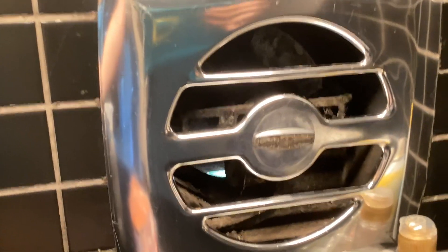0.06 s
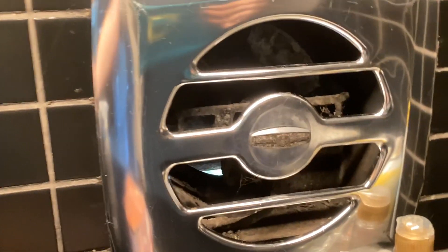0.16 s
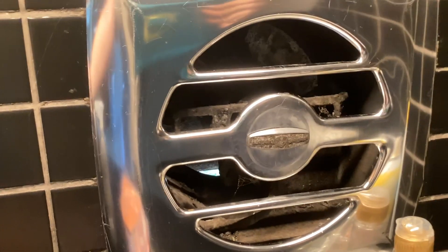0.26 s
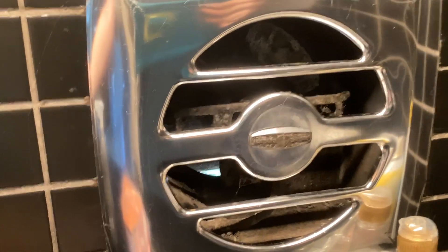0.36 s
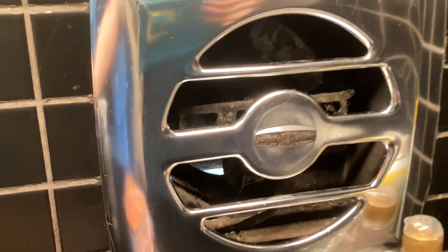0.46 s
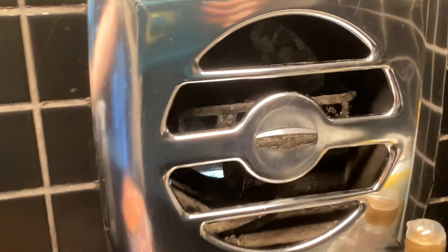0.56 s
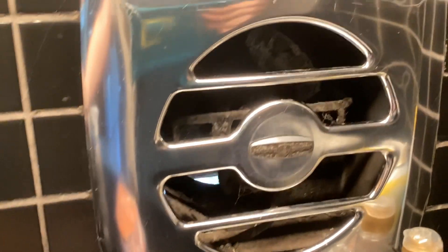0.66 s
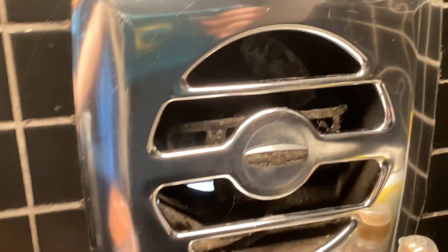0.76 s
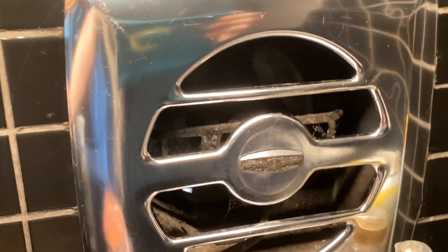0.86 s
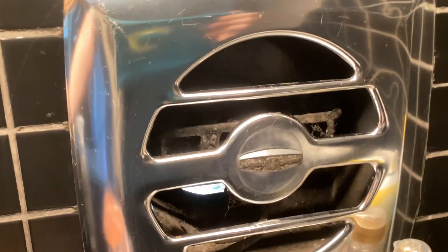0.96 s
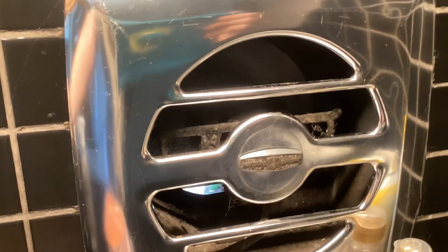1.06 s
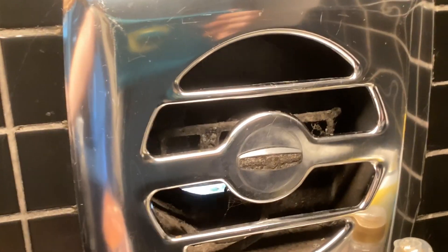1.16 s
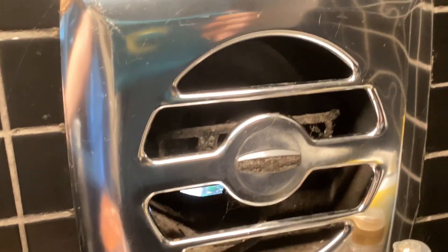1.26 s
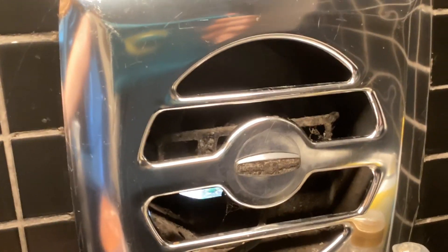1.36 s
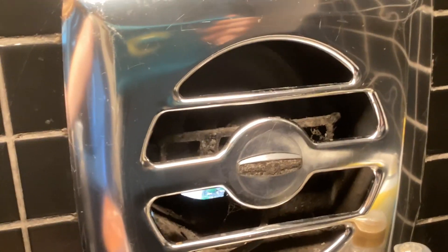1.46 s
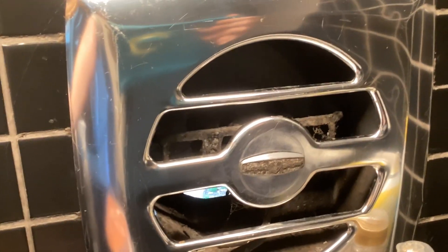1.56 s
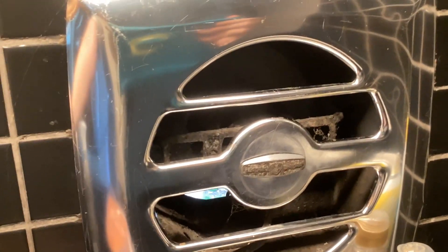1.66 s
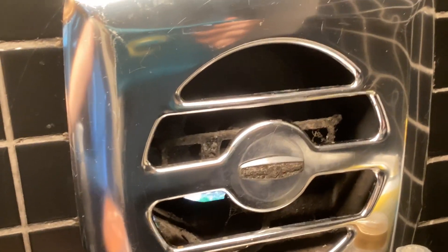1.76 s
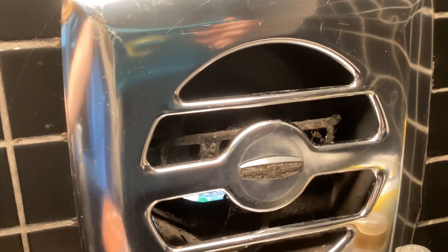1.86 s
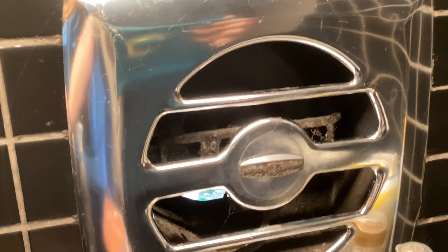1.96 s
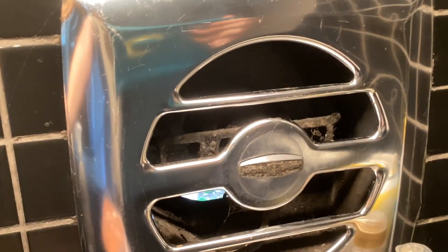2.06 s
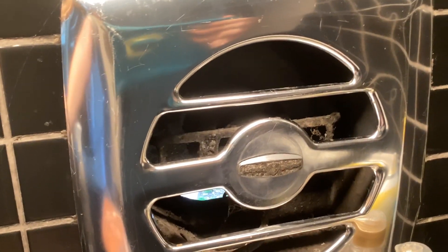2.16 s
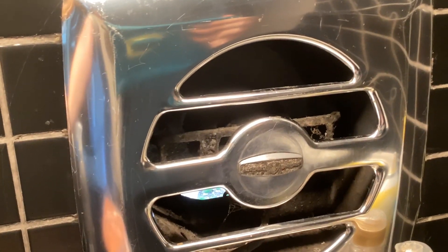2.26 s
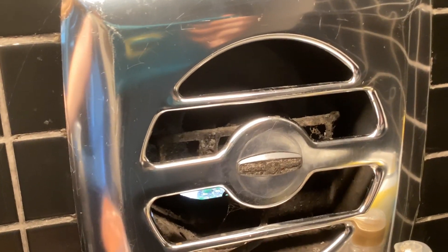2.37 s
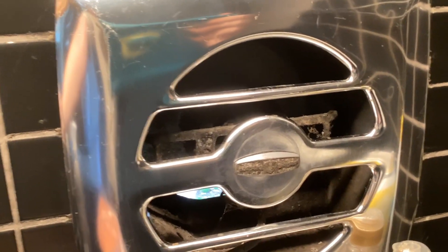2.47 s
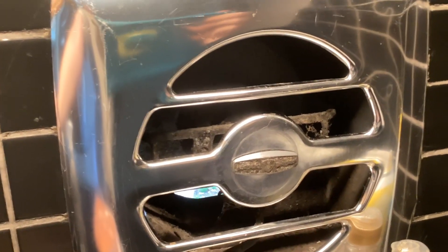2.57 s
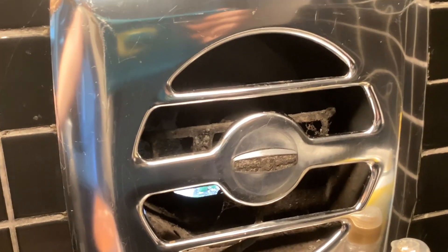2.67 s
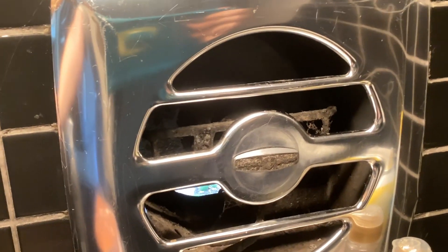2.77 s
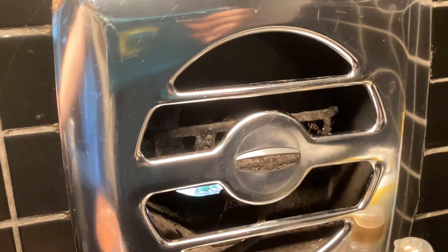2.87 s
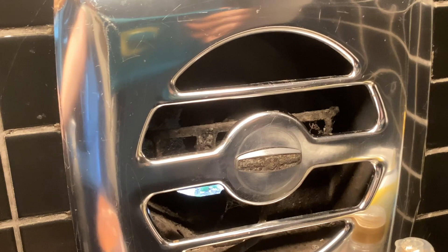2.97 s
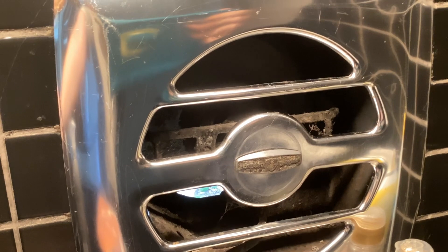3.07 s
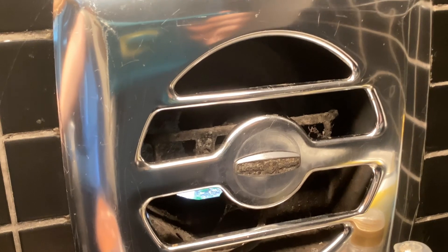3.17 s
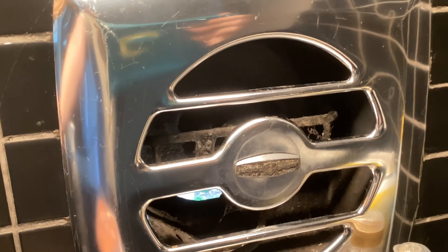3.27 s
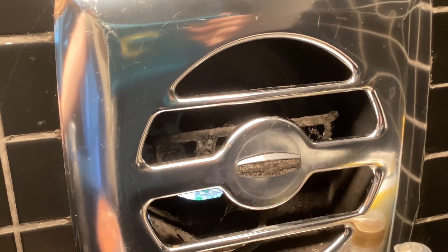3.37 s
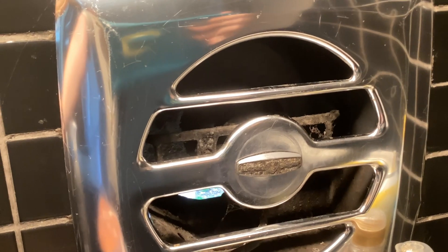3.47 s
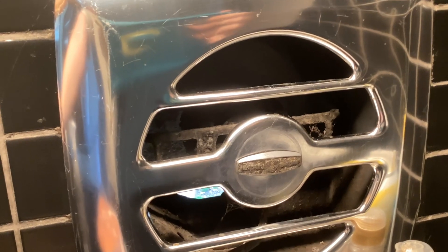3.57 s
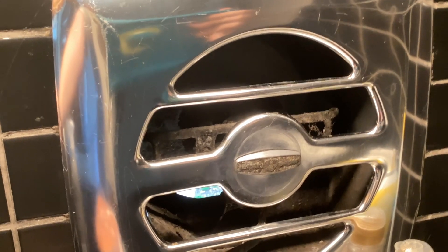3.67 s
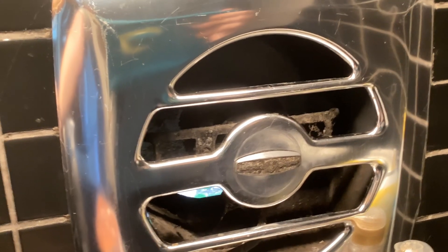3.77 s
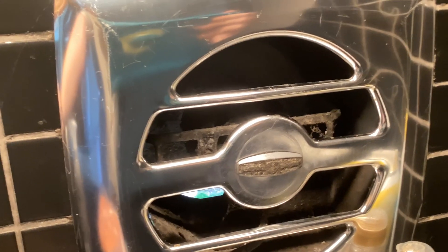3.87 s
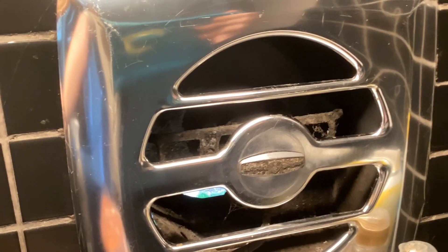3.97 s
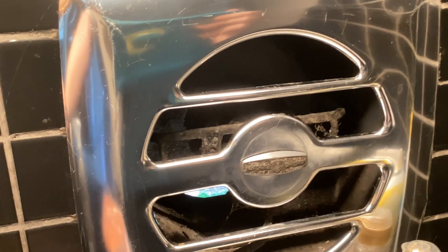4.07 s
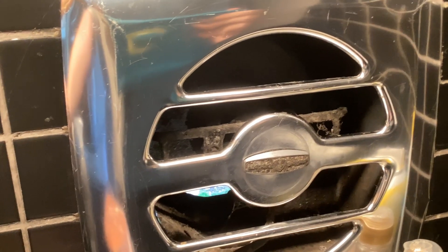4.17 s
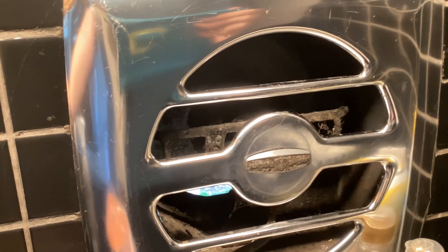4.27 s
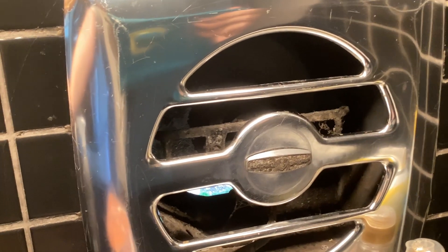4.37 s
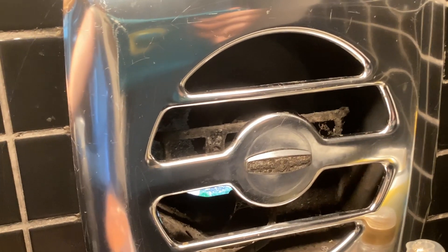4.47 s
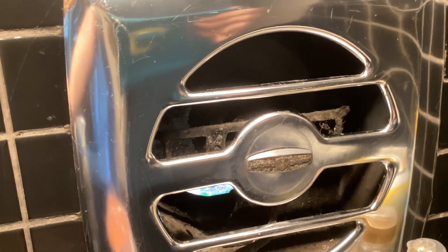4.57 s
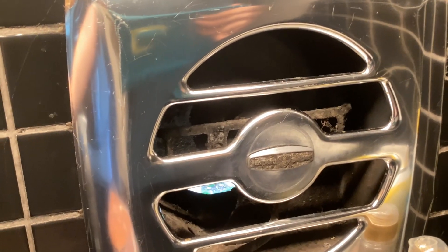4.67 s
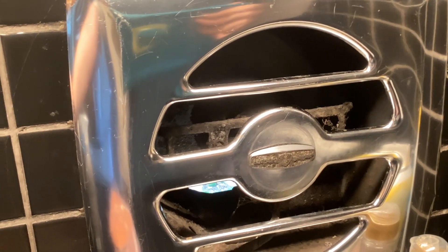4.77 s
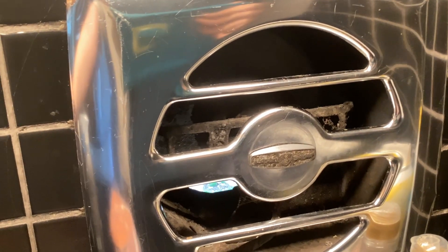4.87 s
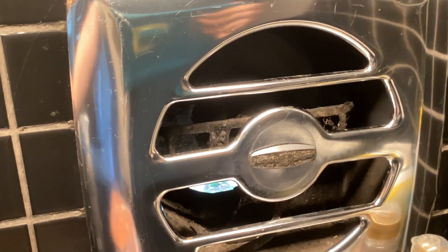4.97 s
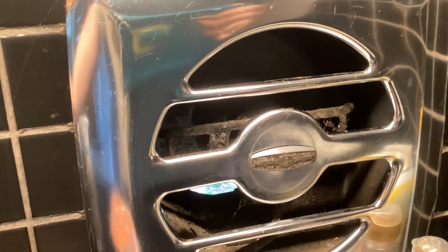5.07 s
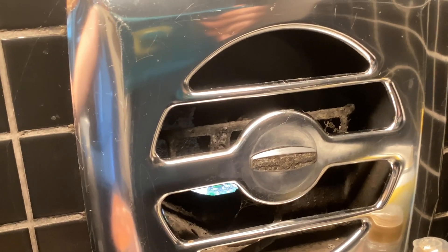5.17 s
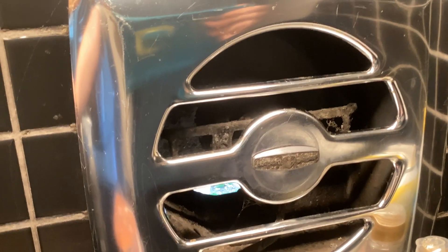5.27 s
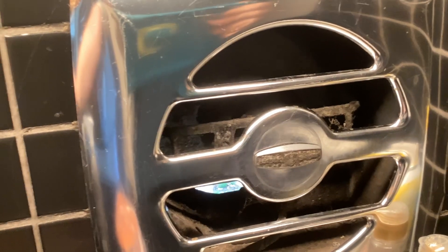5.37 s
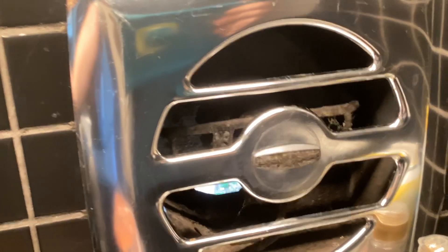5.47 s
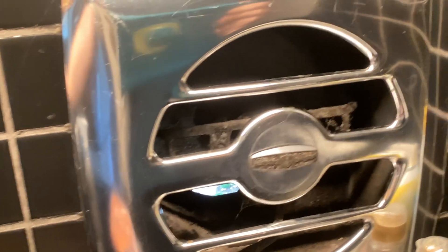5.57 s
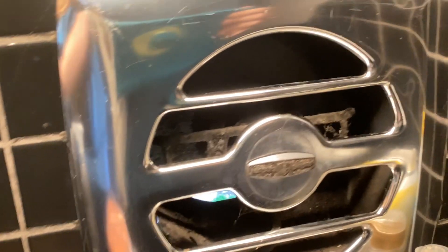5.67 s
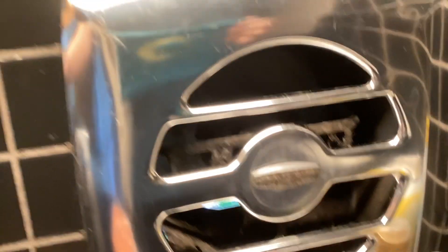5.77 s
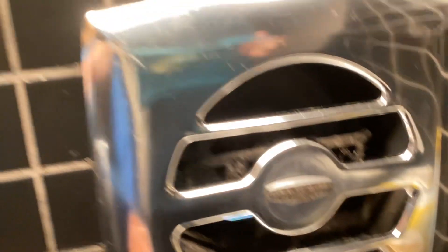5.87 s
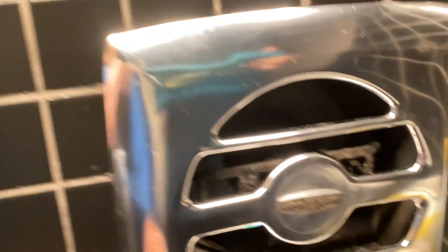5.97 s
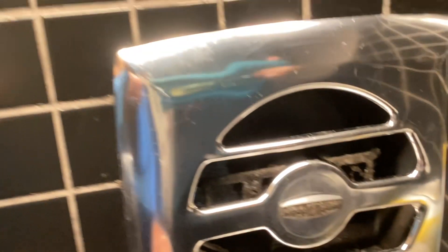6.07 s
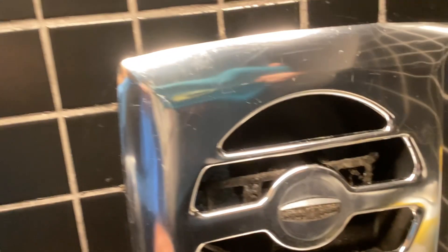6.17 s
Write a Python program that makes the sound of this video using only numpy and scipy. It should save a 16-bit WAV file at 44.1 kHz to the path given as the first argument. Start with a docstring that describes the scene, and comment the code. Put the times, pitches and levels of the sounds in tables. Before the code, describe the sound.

A switch snaps, a small exhaust fan hums and whirs up with loose scraping, runs steadily, then clicks off and rattles while coasting down.

```python
"""A tiled kitchen, with the microphone close to the grille of a small wall exhaust fan.
After a soft bump and a small knock the switch snaps, the motor hums and a three-bladed rotor spins up.
It runs, then coasts down when the power goes. One shaft speed steers the air noise, the blade tones
and the bearings; at listed moments the loose rotor scrapes its surround in short strokes of noise.
Resonances of housing, duct and frame colour it all, over a still room with microphone hiss."""
import sys
import numpy as np
from scipy import signal
from scipy.fft import rfft, irfft, next_fast_len
from scipy.io import wavfile
from scipy.ndimage import uniform_filter1d, map_coordinates

SR = 44100
rng = np.random.default_rng(int(sys.argv[2]) if len(sys.argv) > 2 else 0)


def log_audio(samples):
    """Write samples as a 16-bit WAV file to the path given in sys.argv[1]."""
    # one column per channel
    frames = np.atleast_2d(samples).T
    # limit to full scale, then quantise
    limited = np.clip(frames, -1, 1)
    pcm = np.round(limited * 32767).astype(np.int16)
    wavfile.write(sys.argv[1], SR, pcm)


N = 274919
T = np.arange(N) / SR

# power on and off (s), and the speed the rotor levels off at (turns per s)
ON_S, OFF_S, FULL_RPS = .81, 5.39, 48.1

# multiples of the turning rate at which the three blades sound: multiple [turns]
BLADE_MULTIPLES = (3, 6, 9, 12, 18)
# colour of a light graze: (frequency [Hz], level [dB per Hz])
GRAZE_COLOUR = [(2000, 0.5), (4300, -15.5), (6200, -2), (8000, 6), (11000, 5.5), (13000, 3), (15500, -39.5)]
# colour of a deep rasp: (frequency [Hz], level [dB per Hz])
RASP_COLOUR = [(400, -21), (950, 5), (1900, -7.5), (2550, 1.5), (3700, 0.5), (4400, -10), (8000, -18),
               (15000, -28)]


def amp(db):
    """Decibels to gain."""
    return 10 ** (np.asarray(db) / 20)


def evened(x):
    """Scales to rms 1."""
    return x / np.sqrt(np.mean(x ** 2) + 1e-20)


def read(points, hz):
    """Reads a spectrum on a log-frequency axis."""
    f, value = np.transpose(points)
    return np.interp(np.log(hz + 1), np.log(f + 1), value)


def add(mix, s, sound):
    """Mixes a sound in at time s."""
    part = mix[round(s * SR):][:len(sound)]
    part += sound[:len(part)]


def noise(gain, size=N):
    """Noise of rms 1 with the spectrum gain(hz)."""
    length = next_fast_len(size)
    spectrum = rfft(rng.standard_normal(length))
    coloured = irfft(spectrum * gain(np.fft.rfftfreq(length, 1 / SR)), length)
    return evened(coloured[:size])


def wander(rate):
    """Smooth chance of rms 1 that changes about rate times a second."""
    knots = rng.standard_normal(4096)
    coarse = map_coordinates(knots, [T[::64] * rate], order=3, mode="wrap")
    return evened(coarse)[np.arange(N) // 64]


def bumps_db(resonances, hz):
    """Peaks and dips that a set of resonances adds to a spectrum."""
    return sum(db / (1 + (2 * (hz - f) / width) ** 2) for f, width, db in resonances)


def resonance_gain(modes, f):
    """Spectrum of a set of resonances."""
    return sum(amp(db) / (1 + (2 * (f - hz) / width) ** 2) for hz, width, db in modes)


def ringing(modes):
    """Noise of rms 1 that sounds only in the given resonances."""
    return noise(lambda f: resonance_gain(modes, f))


def burst(bands, rise=.002):
    """A blow: bands of noise that each swell and die at their own pace."""
    t, out = np.arange(SR // 2) / SR, np.zeros(SR // 2)
    centres = [row[0] for row in bands]
    edges = [centres[0] / 2, *centres, centres[-1] * np.sqrt(2)]
    for k, (hz, db, delay, t60) in enumerate(bands):
        # each band fades in and out between its neighbours' centres
        triangle = [(edges[k], 0), (hz, 1), (edges[k + 2], 0)]
        band = noise(lambda f: np.sqrt(read(triangle, f)), size=len(t))
        age = np.maximum(t - delay, 0)
        out += band * (1 - np.exp(-(age / rise) ** 2)) * amp(db - 60 * age / t60)
    return out


def struck(modes, wait_cycles=1, swell_cycles=1.3):
    """Modes rung by a blow; the low ones take longer to build."""
    t, out = np.arange(SR // 2) / SR, np.zeros(SR // 2)
    for hz, db, t60 in modes:
        age = np.maximum(t - wait_cycles / hz, 0)
        swell = 1 - np.exp(-(age * hz / swell_cycles) ** 2)
        out += swell * amp(db - 60 * age / t60) * np.sin(2 * np.pi * hz * age)
    return out


def stroke(gain, rise, contact, t60):
    """One short rub with the spectrum gain(hz): it swells, holds while in contact and dies."""
    t = np.arange(SR // 8) / SR
    shape = (1 - np.exp(-t / rise)) * amp(-60 * np.maximum(t - contact, 0) / t60)
    return evened(shape * noise(gain, size=len(t))) * np.sqrt(np.mean(shape ** 2))


def room_tone(level_db):
    """The still kitchen and the microphone's hiss: steady coloured noise."""
    # (frequency [Hz], level [dB per Hz])
    still_colour = [(25, -29.5), (60, 1), (115, 6), (200, -12), (500, -16.5), (1200, -26), (3000, -30.5),
                    (8000, -33.5), (11800, -24), (15500, -36)]
    return amp(level_db) * noise(lambda f: amp(read(still_colour, f)))


def kitchen(x, wet_db=-13.5, t60=0.17, damp_hz=3600):
    """Short reverberation off the tiles: decaying noise, softened in the treble, from 6 ms on."""
    t = np.arange(SR // 2) / SR
    tail = noise(lambda f: 1 / np.hypot(1, f / damp_hz), size=len(t))
    tail = tail * amp(-60 * t / t60) * (t > .006)
    return x + amp(wet_db) * signal.fftconvolve(x, tail / np.linalg.norm(tail))[:N]


def handling():
    """A soft, low bump and a small knock before the switch: noise bands and rung modes."""
    bump_s, knock_s = .270, .590
    # noise of the bump and of the knock: (centre [Hz], level [dB], delay [s], t60 [s])
    bump_bands = [(220, -53, .005, .1), (520, -61, .003, .1), (1200, -68, .001, .09), (4000, -89, 0, .06),
                  (12000, -65, 0, .07)]
    knock_bands = [(704, -84, 0.007, .1), (2300, -72, 0.0021, 0.09), (5000, -86, 0.004, 0.064),
                   (12000, -65, 0.00088, 0.11)]
    # modes they ring: (frequency [Hz], level [dB], t60 [s])
    bump_rings = [(86, -43, .12), (158, -42, .15), (215, -45, .06), (377, -56, .1)]
    knock_rings = [(1630, -75.5, 0.15), (1940, -78, .2), (2794, -66, 0.07)]
    out = np.zeros(N)
    bump = burst(bump_bands, rise=0.0023) + struck(bump_rings, wait_cycles=1.2, swell_cycles=1.3)
    knock = burst(knock_bands, rise=0.00091) + struck(knock_rings, wait_cycles=5.7, swell_cycles=3)
    add(out, bump_s, bump)
    add(out, knock_s, knock)
    return out


def swishes():
    """Thin hisses: a faint, fading one from the knock on, another as the rotor gets moving."""
    # (time [s], length [s], level [dB])
    hisses = [(.59, 0.86, -77.5), (1.235, 0.15, -57)]
    colour = [(1500, -17), (3200, -6.5), (5000, -4), (9000, 3.5), (12000, 14.0), (15500, -10)]
    level = np.zeros(N)
    for s, length, db in hisses:
        age = np.clip((T - s) / length, 0, 1)
        level += amp(db) * np.minimum(age * 10, 1) * (1 - age)
    return level * noise(lambda f: amp(read(colour, f)))


def switch(lag=0.0035, slide_db=-40, slide=0.0036):
    """Each throw slides, snaps, rings the case and echoes; the starting motor jolts the case again."""
    # the switch goes on, then off: (time [s], level [dB])
    switch_throws = [(ON_S, 0), (OFF_S, -5.5)]
    # the snap, then its dying away between the tiles: (centre [Hz], level [dB], delay [s], t60 [s])
    snap_bands = [(250, -39, 0.0082, 0.12), (535, -39, 0.007, .12), (1080, -37, 0, 0.045),
                  (1730, -31.5, 0.0051, .05), (2520, -29.5, 0.0022, .043), (3640, -37.5, 0.0038, .04),
                  (5550, -35.5, 0.0004, 0.03), (8530, -33.5, 0.0019, .047), (11700, -24.5, 0, .045),
                  (14900, -54, 0.011, .03)]
    echo_bands = [(595, -57, .01, .35), (1080, -50, .0087, .33), (1760, -54, .008, .29),
                  (2670, -50, .008, .29), (3900, -54, .0068, .2), (6000, -54.5, .0074, .23),
                  (8800, -53.5, .008, .25), (12000, -50, .008, .23)]
    # modes of the latch and of the case: (frequency [Hz], level [dB], t60 [s])
    latch_modes = [(1985, -33, .055), (2665, -28, .04), (3150, -39.5, 0.053), (3780, -31.5, .055)]
    case_modes = [(80.6, -33.5, .16), (126, -21, .07), (198, -26, .1), (511, -45, .18), (684, -40, .13),
                  (1000, -18.5, .05), (1093, -35, .19), (1155, -41, .2), (1385, -45, .14), (1739, -46, .14),
                  (2692, -50, .22), (2772, -53, .22), (3844, -53, .2)]
    jolt_s, jolt_db = .886, -23
    out = np.zeros(N)
    lead = np.arange(SR // 32) / SR
    case_ring = struck(case_modes, wait_cycles=0.74, swell_cycles=1.5)
    for s, throw_db in switch_throws:
        # the sliding grows louder right up to the snap
        drag = noise(lambda f: amp(read(GRAZE_COLOUR, f)) + amp(read(RASP_COLOUR, f)), size=len(lead))
        add(out, s - lead[-1], amp(throw_db + slide_db) * drag * np.exp(-lead[::-1] / slide))
        snap = burst(snap_bands, rise=0.00015) + struck(latch_modes)
        echo = burst(echo_bands, rise=0.0047)
        add(out, s, amp(throw_db) * (snap + echo))
        add(out, s + lag, amp(throw_db) * case_ring)
    add(out, jolt_s, amp(jolt_db) * case_ring)
    return out


def rotor_speed():
    """Turns per second: a steady run-up that levels off, then drag alone once the power is cut."""
    # the torque builds for a moment; a higher knee levels off more abruptly
    torque_lag_s, gain_rps_per_s, knee = .27, 22.3, 8.5
    coast_s, coast_power = 1.4, 1.27  # time scale and steepness of the slowing by drag
    driven = np.clip(T, ON_S, OFF_S) - ON_S
    coasting = np.maximum(T - OFF_S, 0)
    ramp = gain_rps_per_s * (driven + torque_lag_s * np.expm1(-driven / torque_lag_s))
    speed = ramp / (1 + abs(ramp / FULL_RPS) ** knee) ** (1 / knee)
    return speed / (1 + coasting / coast_s) ** coast_power


def hum(speed, curve=0.96, release=0.046):
    """The powered motor iron buzzes at twice the mains frequency, louder and less steady with speed."""
    # partials: (frequency [Hz], relative level [dB])
    partials = [(120, -1.5), (240, -37.5), (840, -25.5), (960, -24.5)]
    rest_db, full_db = -48.5, -32.5  # at rest and at full speed
    waver_db, rough_db = 2.2, 1.5  # waver at full speed; roughness per octave above the lowest partial
    lines = np.zeros(N)
    for hz, db in partials:
        roughness = rough_db * np.log2(hz / partials[0][0]) * wander(45)
        lines += amp(db + roughness) * np.sin(2 * np.pi * (hz * T + rng.random()))
    powered = np.clip((T - ON_S) / release, 0, 1) * np.clip((OFF_S + release - T) / release, 0, 1)
    share = abs(speed / FULL_RPS) ** curve
    strength = (1 - share) * amp(rest_db) + share * amp(full_db)
    return evened(lines) * strength * amp(waver_db * share * wander(31)) * powered


def bearings(octaves, turns, level_db=-41, growth_db=7, throb=0.11, whirl=0.15, lumpy_db=2.0):
    """Rolling noise rings the frame unevenly, surging twice a turn and in a whirl at half speed."""
    # resonances of the motor frame: (frequency [Hz], width [Hz], level [dB])
    frame_modes = [(338.7, 20, 0.5), (413, 86, -4), (703, 6.6, -2), (861.7, 10, 8.5), (945, 94, -7.5),
                   (1210, 210, -16.5)]
    spin = 2 ** (octaves / 2)  # the surges deepen with speed
    surge = (1 + spin * throb * np.cos(4 * np.pi * turns)) * (1 + spin * whirl * np.cos(np.pi * turns))
    level = level_db + growth_db * octaves + lumpy_db * wander(18)
    return ringing(frame_modes) * surge * amp(level) * (T > ON_S)


def rolling(speed, turns, level_db=-52, growth_db=10, fade_rps=30, count=14):
    """While the driven rotor is slow, overtones of the rolling balls glide through frame resonances."""
    # (frequency [Hz], width [Hz], level [dB])
    glide_modes = [(348, 33, 2), (412, 46, 1), (705, 22, -5), (866, 25, 4), (945, 70, -2)]
    balls_per_turn = 6  # balls that roll past in one turn
    colour, out = resonance_gain(glide_modes, np.arange(SR // 4)), np.zeros(N)
    for k in range(1, count + 1):
        order = k * balls_per_turn
        out += colour[(order * speed).astype(int)] * np.sin(2 * np.pi * (order * turns + rng.random()))
    level = level_db + growth_db * np.log2(np.maximum(speed, 1) / fade_rps)
    slow = np.clip(speed - 2, 0, 1) * np.exp(-(speed / fade_rps) ** 6)
    return out * amp(level) * slow * (T < OFF_S)


def whine(speed, octaves, turns, level_db=-52, growth_db=16.5, grain_db=1.9, gap=0.72, limp=.2,
          dry_rps=7.5):
    """Above dry_rps a dry spot in the bearing chirps twice a turn, one chirp stronger than the other."""
    # thin ringing of the bearings: (frequency [Hz], width [Hz], level [dB])
    bearing_modes = [(1540, 200, -29), (3070, 88, -16), (3530, 200, -21), (4920, 110, 15), (6800, 170, 4)]
    chirps = (1 + gap * np.cos(4 * np.pi * turns)) * (1 + limp * np.cos(2 * np.pi * turns))
    chirps = chirps * amp(grain_db * wander(50))
    level = amp(level_db + growth_db * octaves)
    return evened(ringing(bearing_modes) * chirps) * level * np.clip(speed - dry_rps, 0, 1)


def shudder(speed, turns, level_db=-34.0, driven_db=-4, critical_rps=33.55, spread_rps=1.8, hz=965,
            width_hz=110):
    """Near its critical speed the rotor shakes and the case rings; power holds the rotor steadier."""
    throb = .65  # depth of the once-a-turn pulsing (0-1)
    near = np.exp(-.5 * ((speed - critical_rps) / spread_rps) ** 2)
    level = level_db + driven_db * (T < OFF_S)
    return amp(level) * near * ringing([(hz, width_hz, 0)]) * (1 + throb * np.cos(2 * np.pi * turns))


def brushing(speed, turns, level_db=-64, growth_db=13, from_rps=8.6, until_rps=29, depth_db=5,
             uneven_db=1.5):
    """While slow and driven, the rotor brushes its surround in an uneven patch on each turn."""
    # resonances it rings: (frequency [Hz], width [Hz], level [dB])
    brushed_modes = [(1164, 120, 14), (1553, 60, 9), (1900, 150, -10), (2910, 89, 3), (3330, 150, -15),
                     (3800, 130, -23)]
    touching = np.clip(speed - from_rps, 0, 1) * np.clip(until_rps - speed, 0, 1) * (T < OFF_S)
    level = level_db + growth_db * np.log2(np.maximum(speed, 1) / (2 * from_rps))
    patch_db = depth_db * np.cos(2 * np.pi * turns) + uneven_db * wander(29.43)
    return ringing(brushed_modes) * touching * amp(level + patch_db)


def scrapes(driven_ring_db=2.0, coasting_ring_db=-1, driven_rasp_db=0, coasting_rasp_db=2.5):
    """The loose rotor grazes its surround: a hiss, a chirp of the metal and a lower rasp each time."""
    # touches: (time [s], bright graze level [dB], low rasp level [dB])
    touches = [(2.327, -52, -57), (2.391, -37, -38), (2.425, -42, -45), (2.456, -34.5, -42),
               (2.490, -47, -46), (2.53, -50, -41), (2.568, -45, -35.5), (2.606, -41.5, -33),
               (2.623, -45, -38), (2.633, -49, -37), (2.641, -41, -39), (2.658, -49, -51),
               (2.708, -55, -39), (2.741, -44, -37), (2.767, -42, -36.5), (2.792, -50, -47),
               (2.834, -45, -43), (2.867, -45, -40), (2.897, -49, -40.5), (2.923, -54, -40),
               (2.970, -44, -41), (4.366, -34.5, -54), (5.367, -37, -44), (5.429, -39, -48),
               (5.658, -46, -47), (5.682, -41, -45), (5.71, -45, -45), (5.737, -39.5, -44),
               (5.764, -39.5, -41), (5.793, -40, -47), (5.821, -40, -44), (5.852, -42, -43),
               (5.880, -41, -41), (5.885, -50, -43), (5.915, -57, -39.5), (5.927, -47, -41),
               (5.95, -58, -39.5), (5.98, -46, -41), (6.014, -49, -39.5), (6.046, -48, -42),
               (6.082, -47, -40.5), (6.117, -44, -39.5), (6.132, -47, -55), (6.154, -41, -37),
               (6.169, -42, -42), (6.189, -41, -36.5), (6.206, -38.5, -50), (6.224, -44, -36)]
    # resonances of the scraped metal: (frequency [Hz], width [Hz], level [dB])
    metal_modes = [(4960, 260, 0), (6950, 250, -10), (8800, 600, -18.5)]
    rebound_s, rebound_db = .016, -13  # the rasp catches again just after the first touch
    out = np.zeros(N)
    for s, graze_db, rasp_db in touches:
        hiss = stroke(lambda f: amp(read(GRAZE_COLOUR, f)), rise=0.00022, contact=0.0033, t60=0.049)
        chirp = stroke(lambda f: resonance_gain(metal_modes, f), rise=0.001, contact=0.003, t60=0.02)
        if s < OFF_S:
            ring_db, bite_db = driven_ring_db, driven_rasp_db
        else:
            ring_db, bite_db = coasting_ring_db, coasting_rasp_db
        add(out, s, amp(graze_db) * (hiss + amp(ring_db) * chirp))
        for delay, db in ((0, bite_db), (rebound_s, rebound_db)):
            rasp = stroke(lambda f: amp(read(RASP_COLOUR, f)), rise=.0005, contact=.005, t60=.027)
            add(out, s + delay, amp(rasp_db + db) * rasp)
    return out


def boom(speed, level_db=-37.0, worst_rps=41, spread_rps=2.3, hz=88, width_hz=14):
    """The duct booms for a while as the fan pushes the standing air into motion."""
    near = np.exp(-.5 * ((speed - worst_rps) / spread_rps) ** 2) * np.clip(OFF_S - T, 0, 1)
    return amp(level_db) * near * ringing([(hz, width_hz, 0)])


def buffets(hz=82):
    """Brief low swells of one tone: three in the run-up, and a low thump just after the switch goes off."""
    # (time [s], half length [s], level [dB])
    swells = [(1.62, .06, -51), (2.635, 0.026, -28), (2.775, 0.032, -35), (5.41, .025, -33)]
    level = sum(amp(db) * np.exp(-((T - s) / half) ** 2) for s, half, db in swells)
    return level * np.sin(2 * np.pi * (hz * T + rng.random()))


def housing_db(hz):
    """Colour of the airflow after the resonances of the housing."""
    # rush of air at full speed: (frequency [Hz], relative level [dB per Hz])
    rush_colour = [(30, -39), (50, -14.5), (80, -6), (125, 0.5), (180, -9), (300, -10.5), (450, -10),
                   (600, -5.5), (1000, -7.5), (1800, -16), (3500, -22.5), (6500, -25.5), (10000, -23),
                   (12300, -20), (15800, -36.5)]
    # resonances of the housing: (frequency [Hz], width [Hz], level [dB])
    housing_modes = [(345, 75, 3.5), (446, 31, -23.5), (520, 200, 6), (917, 24.4, 8), (961.4, 61, 8.5),
                     (1112, 33, -13), (1170, 115, 6.5), (1559, 44, 7), (2376, 40, 10), (2800, 260, 3),
                     (3287, 184, 7.5), (3744, 180, 7), (5110, 770, 4.5), (5920, 39, 12), (6880, 180, 2)]
    return read(rush_colour, hz) + bumps_db(housing_modes, hz)


def shaft(octaves, turns, growth_db=15, tilt_db=-1.5, waver_db=3.0, radiate_hz=230, count=44):
    """Imbalance shakes the housing each turn: a comb of weak lines sweeps through its resonances."""
    # turn multiples shaken more or less than the rest: (multiple [turns], level [dB])
    accents = dict([(2, -9), (5, 8), (7, 3), (8, 7), (11, -4), (14, 4), (16, 5), (21, 5), (24, 5), (27, 3),
                    (31, 5), (33, 3)])
    full_speed_db = -43.5
    grid = np.arange(SR // 8) + 1
    colour_db = housing_db(grid) + tilt_db * np.log2(grid / 1000)
    colour_db = colour_db - 10 * np.log10(1 + (radiate_hz / grid) ** 2)  # the small case radiates little bass
    rps, out = FULL_RPS * 2 ** octaves, np.zeros(N)
    for order in range(1, count + 1):
        if order not in BLADE_MULTIPLES:
            level = colour_db[(order * rps).astype(int)] + accents.get(order, 0) + waver_db * wander(8.2)
            out += amp(level) * np.sin(2 * np.pi * (order * turns + rng.random()))
    return out * amp(full_speed_db + growth_db * octaves)


def blades(speed, octaves, turns, waver_db=-0.5, radiate_hz=63, coasting_db=1.0):
    """Blades pass the struts and grille: tones grow with speed and sweep through duct resonances."""
    # a tone for each multiple, ahead of the duct: (level at full speed [dB], growth [dB per doubling])
    tones = [(-31.5, 10), (-30.5, 18), (-43, 19.5), (-34, 25), (-43.5, 15.5)]
    # peaks and notches of the duct: (frequency [Hz], width [Hz], level [dB])
    duct_modes = [(123.7, 51, 8.5), (264.3, 27.3, -17.5), (327, 28, 9.5), (440, 30, -9), (581.1, 16.4, 7),
                  (864.5, 13, 9.5)]
    flutter_per_s, flutter_db = 35, .13  # turbulence: rate, and depth for each multiple of the turning rate
    out = np.zeros(N)
    for order, (db, growth_db) in zip(BLADE_MULTIPLES, tones):
        hz = order * speed
        level = db + growth_db * octaves + bumps_db(duct_modes, hz)
        level = level + waver_db * wander(8.1) + flutter_db * order * wander(flutter_per_s)
        # the overtones stand out in coasting
        overtone = order > BLADE_MULTIPLES[0]
        level = level + coasting_db * overtone * np.clip((T - OFF_S) * 10, 0, 1)
        radiated = hz ** 4 / (hz ** 4 + radiate_hz ** 4)
        tone = np.sin(2 * np.pi * (order * turns + rng.random()))
        out += np.sqrt(2) * amp(level) * radiated * tone
    return out


def airflow(octaves, turns, level_db=-29.5, patchy_db=1.0, chop=0.086):
    """Turbulence grows and brightens with speed, and throbs a little twice a turn."""
    # growth with speed: (frequency [Hz], growth [dB per doubling of speed])
    speed_growth = [(50, 15.5), (100, 6), (250, 10.5), (600, 14), (1000, 16.5), (2000, 18.5), (6000, 24.5),
                    (14000, 20.5)]
    # the rush outlasts the slowing rotor: (frequency [Hz], gain [dB per s of coasting])
    lingering = [(100, 11.5), (1000, 4.5), (3000, 8), (12000, 2.5)]
    hz, t, z = signal.stft(rng.standard_normal(N), SR, nperseg=2048, noverlap=1536)
    colour = evened(amp(housing_db(hz)))[:, None]
    growth_db = read(speed_growth, hz)[:, None] * np.interp(t, T, octaves)
    # smoothed chance over frequency, then over time
    patches = uniform_filter1d(rng.standard_normal(z.shape), 24, axis=0)
    patches = evened(uniform_filter1d(patches, 6, axis=1))
    linger_db = read(lingering, hz)[:, None] * np.maximum(t - OFF_S, 0)
    z = z * colour * amp(level_db + growth_db + linger_db + patchy_db * patches)
    rush = signal.istft(z, SR, nperseg=2048, noverlap=1536)[1][:N]
    return rush * (1 + chop * np.cos(4 * np.pi * turns))


def scene(quiet_db=-68):
    """One shaft speed drives the air, the blade tones, the motor and the bearings."""
    air_start_s = 0.33  # the air takes a moment to start moving
    speed = rotor_speed()
    turns = np.cumsum(speed) / SR
    octaves = np.log2(np.maximum(speed, 1) / FULL_RPS)  # doublings from full speed
    running = np.clip((T - ON_S) / air_start_s, 0, 1)
    air = airflow(octaves, turns) + shaft(octaves, turns) + blades(speed, octaves, turns)
    air = running * (air + boom(speed) + buffets())
    motor = hum(speed) + bearings(octaves, turns) + rolling(speed, turns)
    motor = motor + whine(speed, octaves, turns) + shudder(speed, turns) + brushing(speed, turns)
    tiled = kitchen(handling() + scrapes() + swishes())
    return (air + motor + switch() + tiled + room_tone(quiet_db))[None]


def record(dry):
    """The microphone's low cut and the recorder's band limit."""
    low_cut_hz, top_hz = 44, 15900
    lean = signal.sosfilt(signal.butter(4, low_cut_hz, "highpass", fs=SR, output="sos"), dry)
    band_limit = signal.firwin(511, top_hz, window=("kaiser", 9), fs=SR)
    return signal.oaconvolve(lean, band_limit[None], "same")


dry = scene()
out = record(dry)
log_audio(out)
```